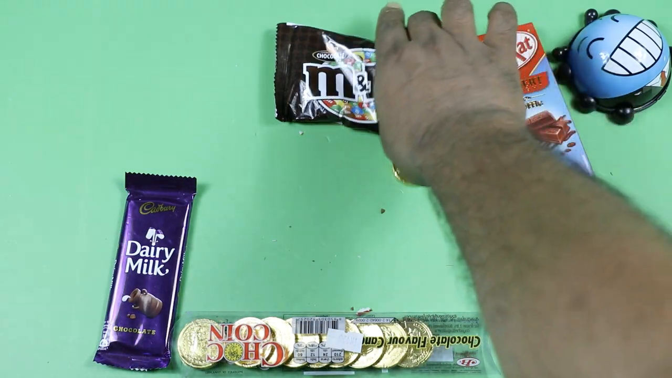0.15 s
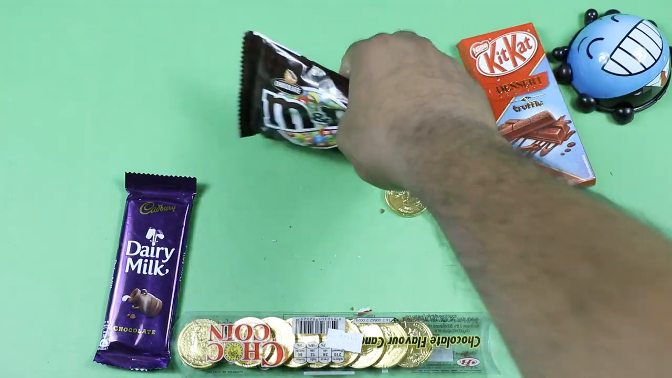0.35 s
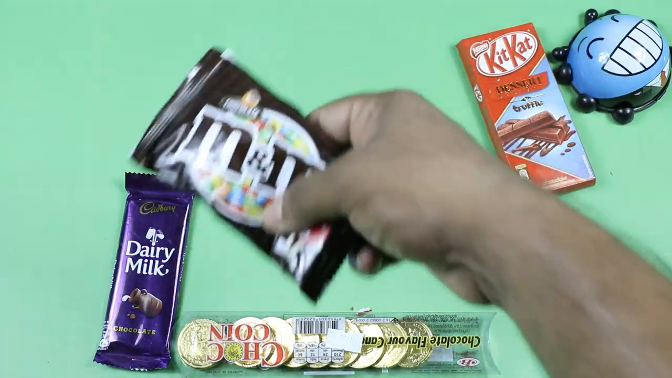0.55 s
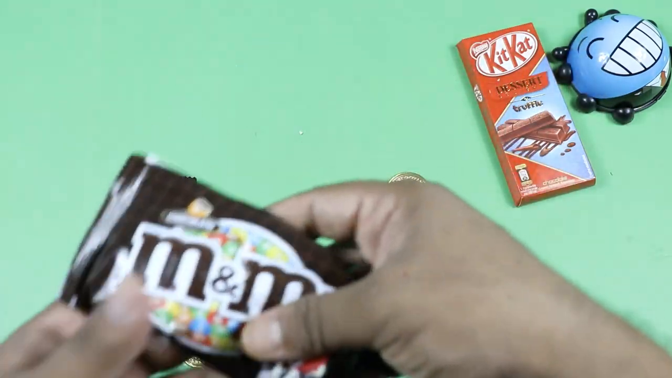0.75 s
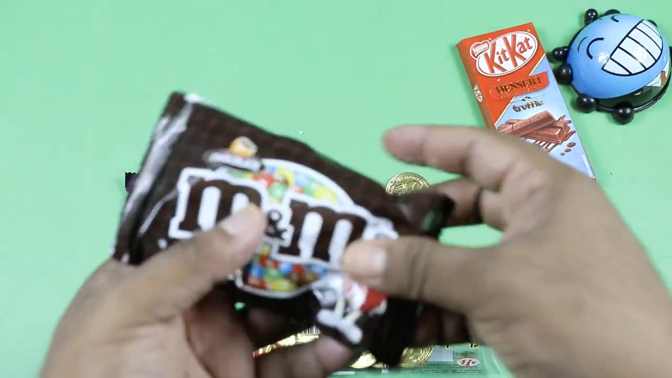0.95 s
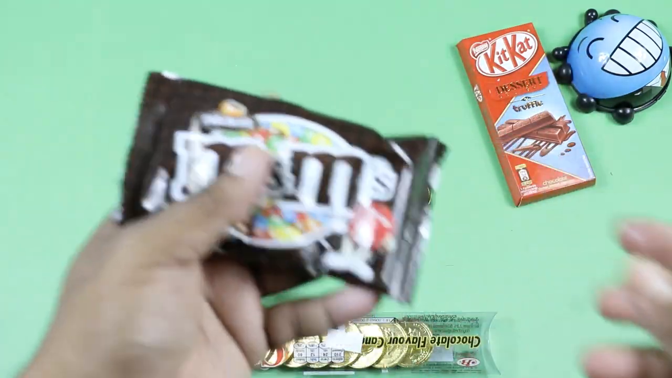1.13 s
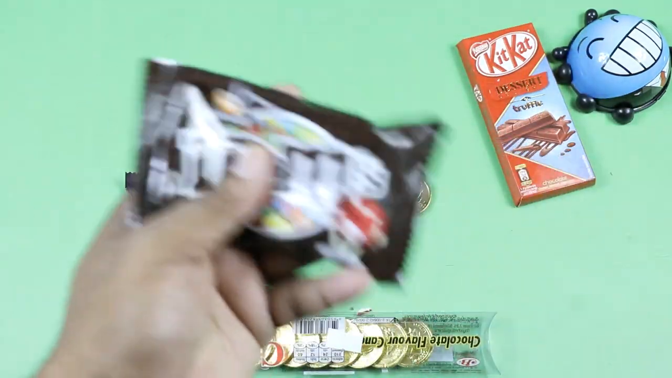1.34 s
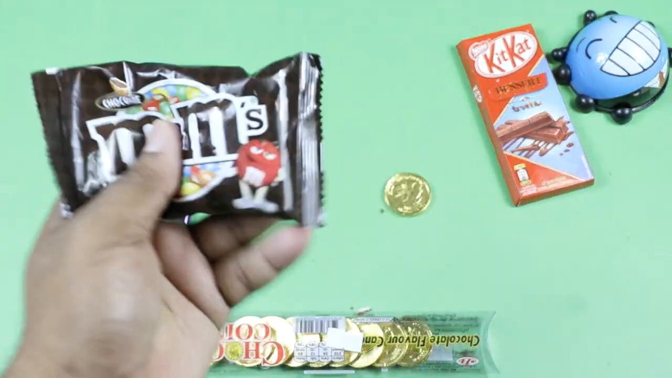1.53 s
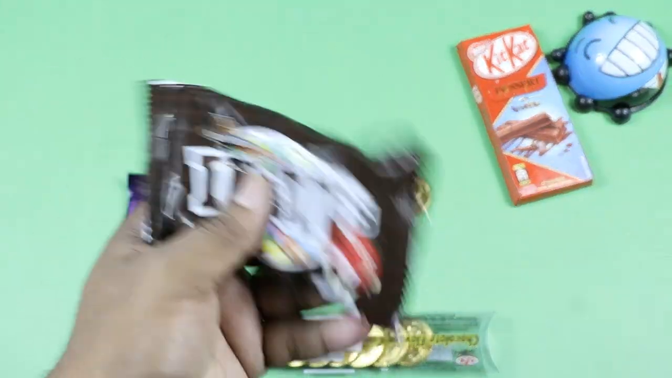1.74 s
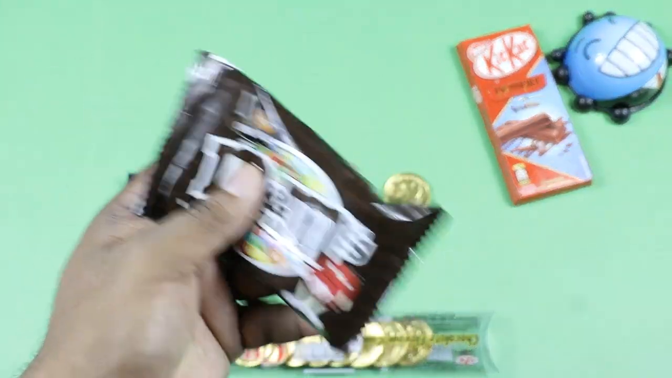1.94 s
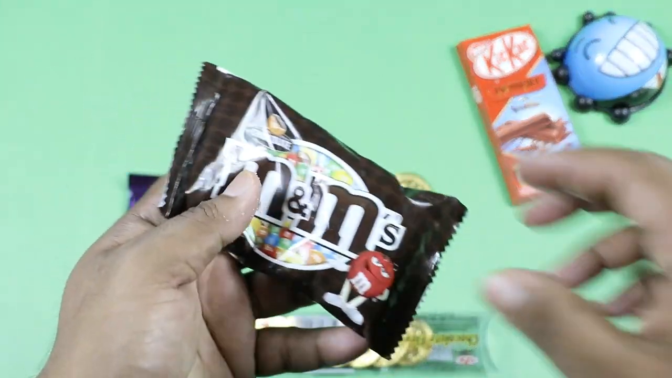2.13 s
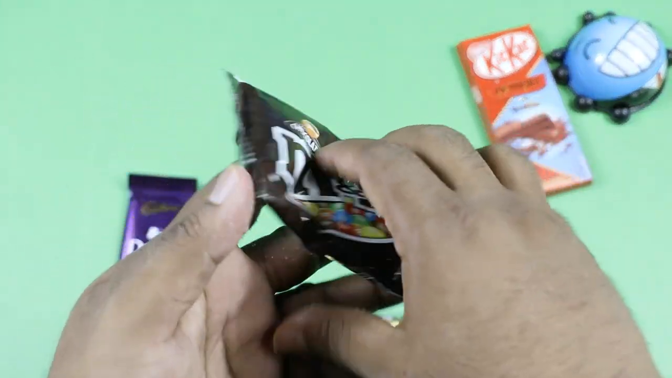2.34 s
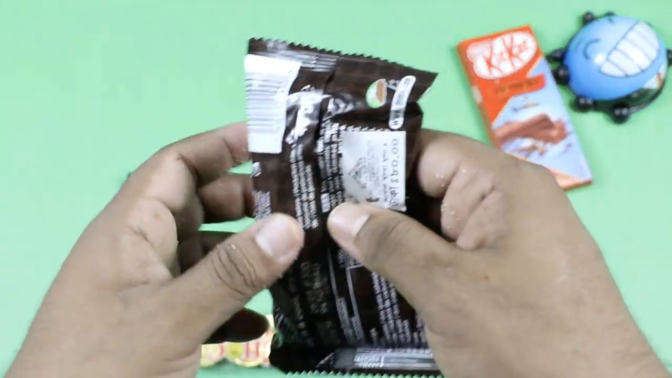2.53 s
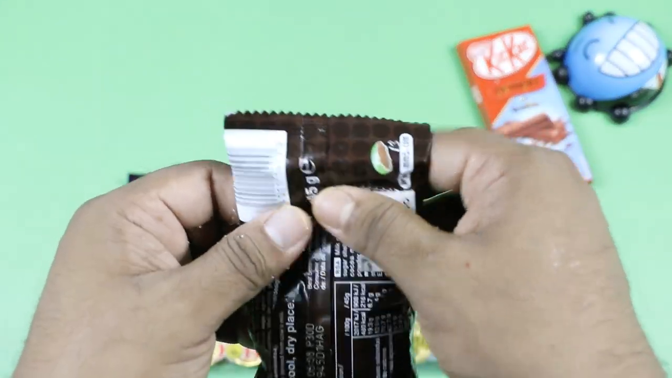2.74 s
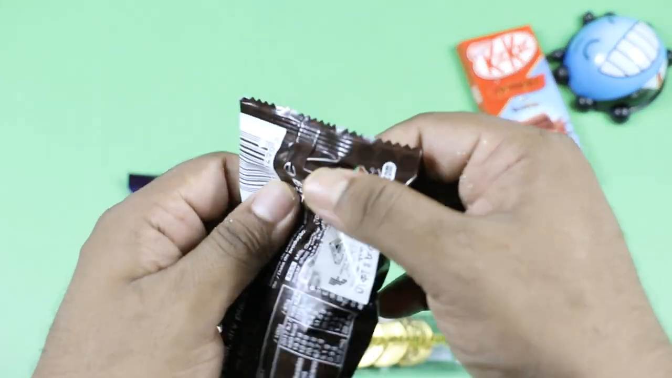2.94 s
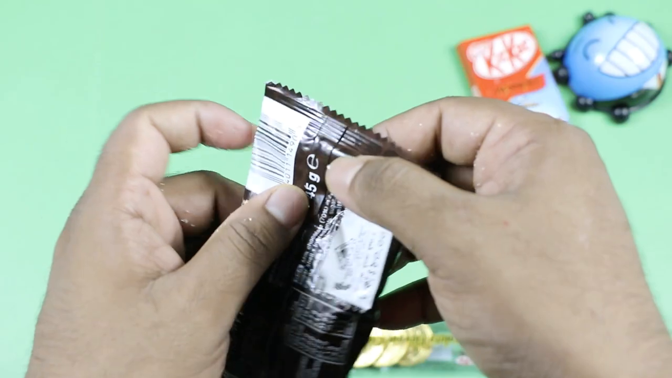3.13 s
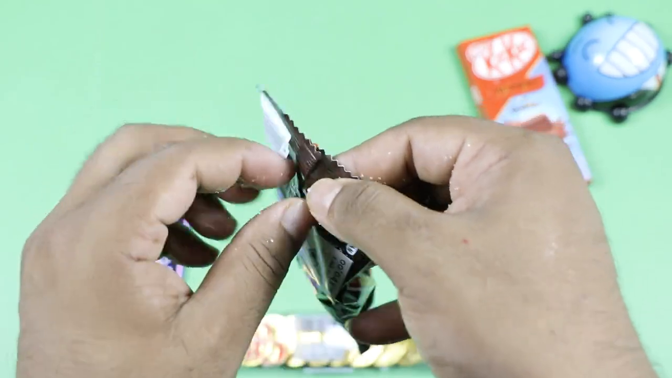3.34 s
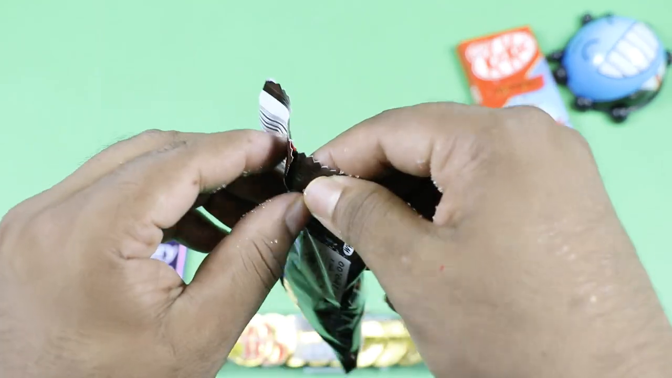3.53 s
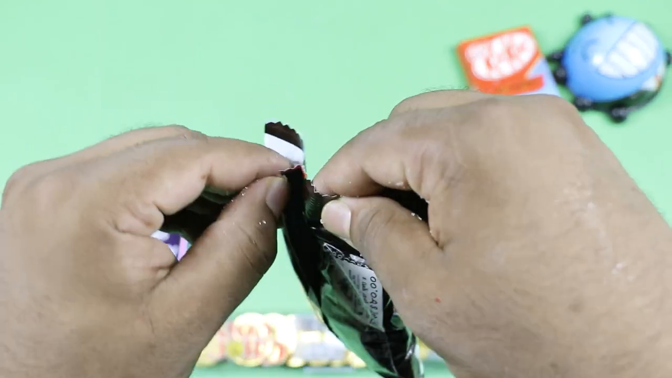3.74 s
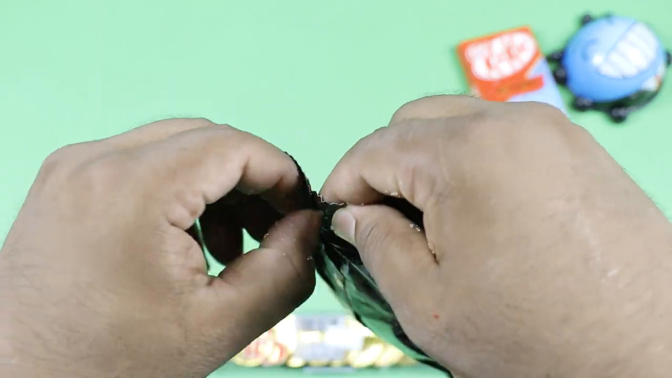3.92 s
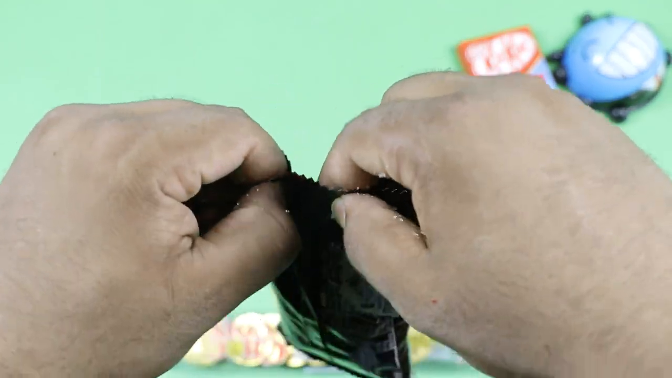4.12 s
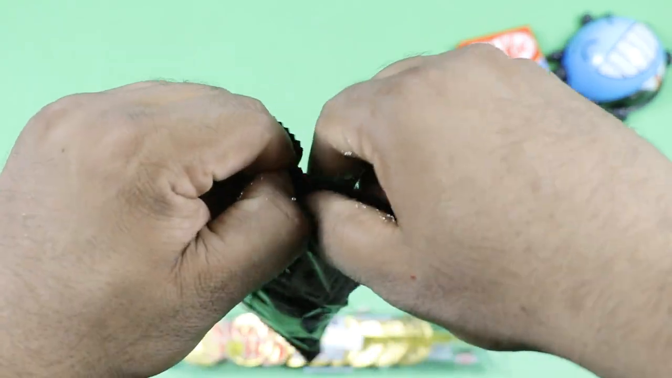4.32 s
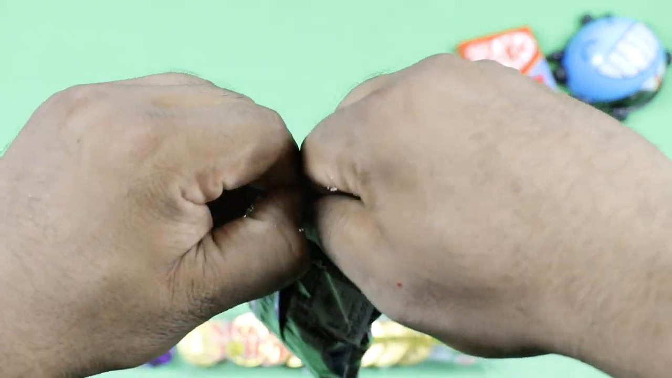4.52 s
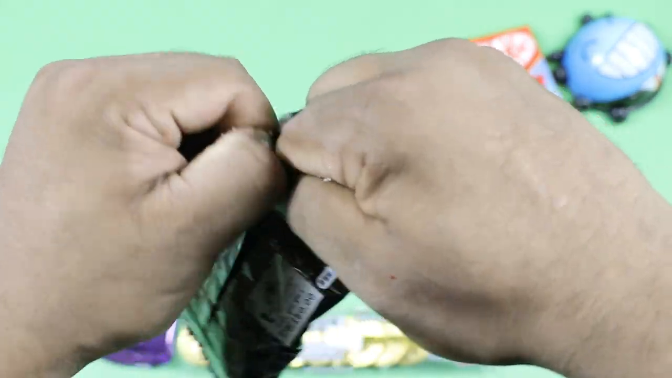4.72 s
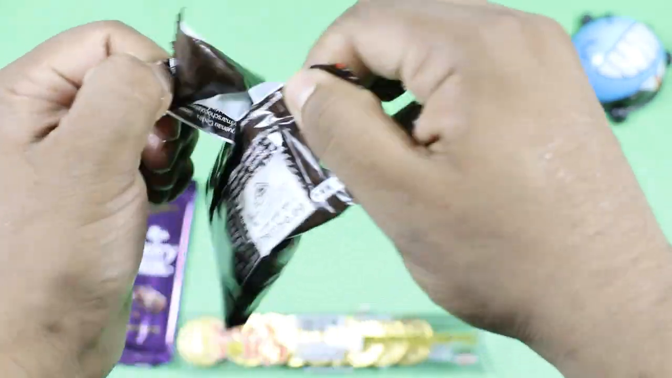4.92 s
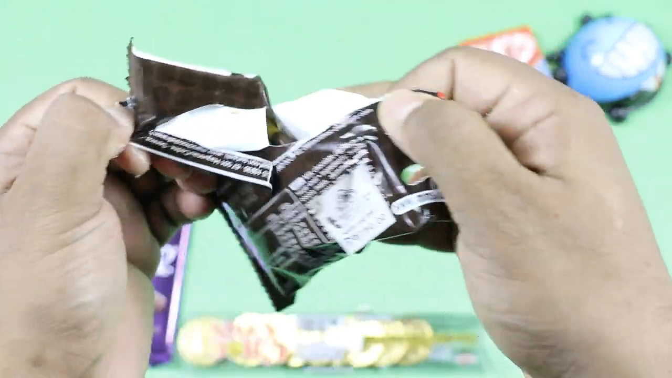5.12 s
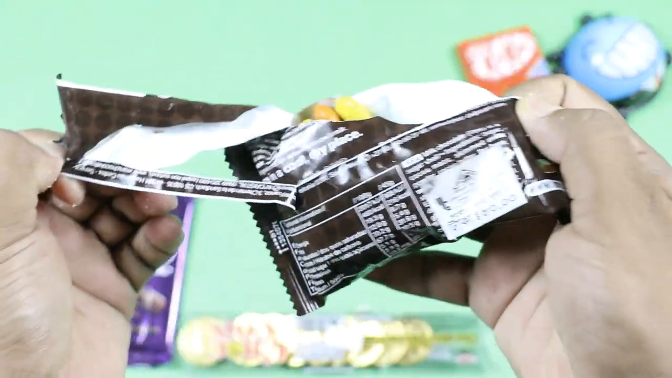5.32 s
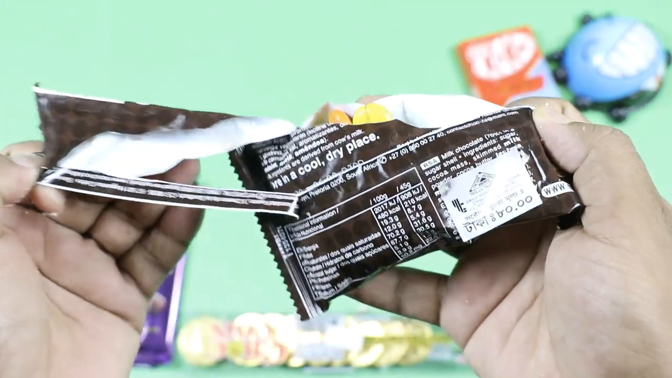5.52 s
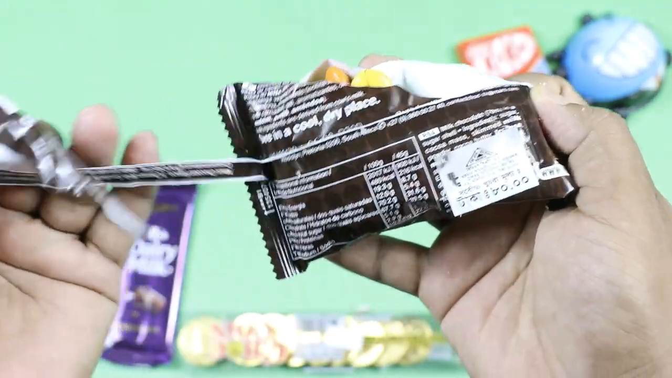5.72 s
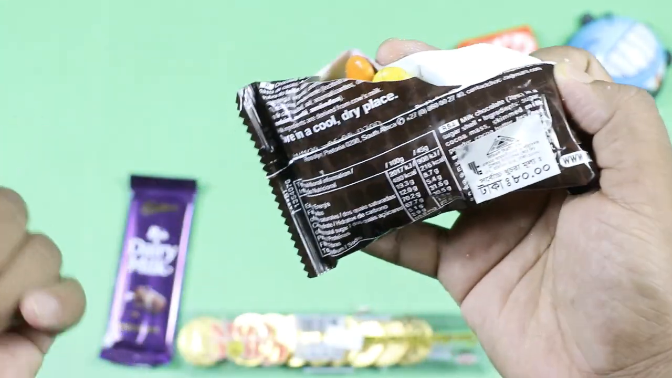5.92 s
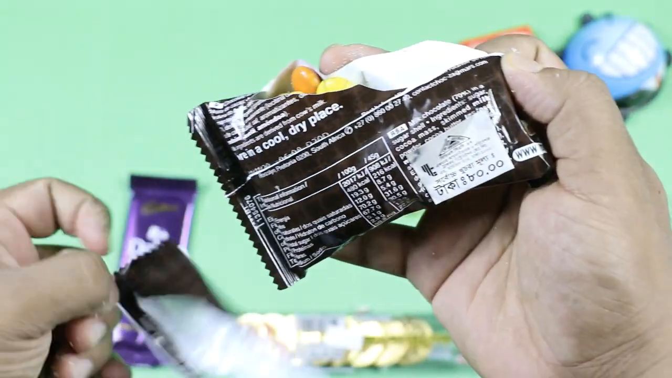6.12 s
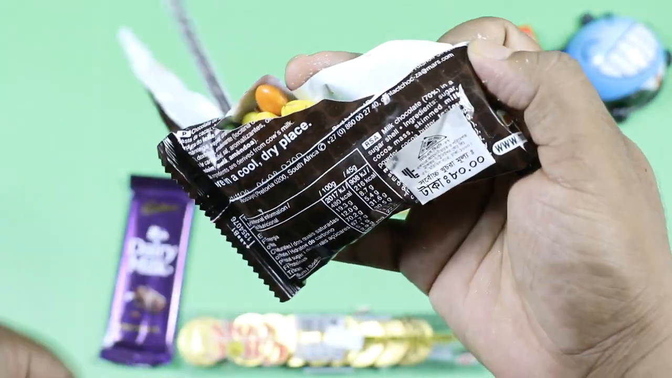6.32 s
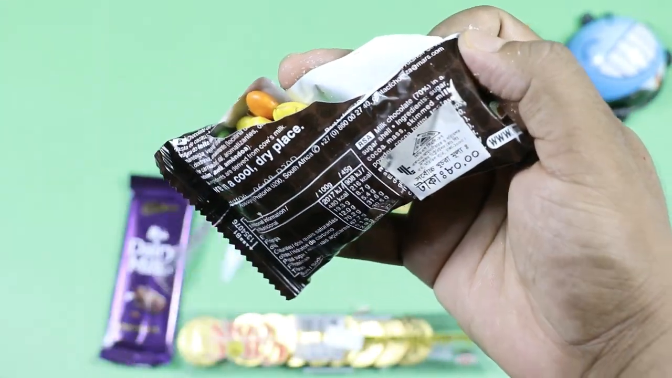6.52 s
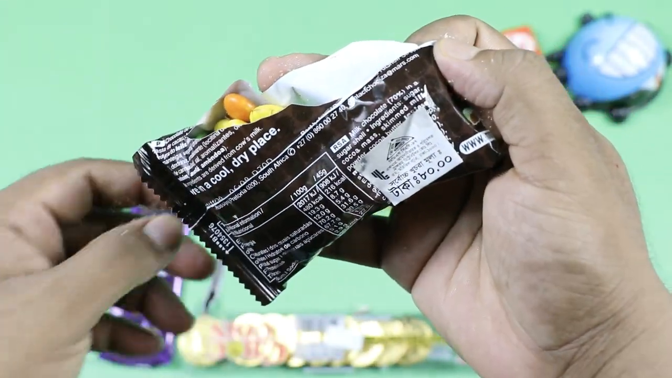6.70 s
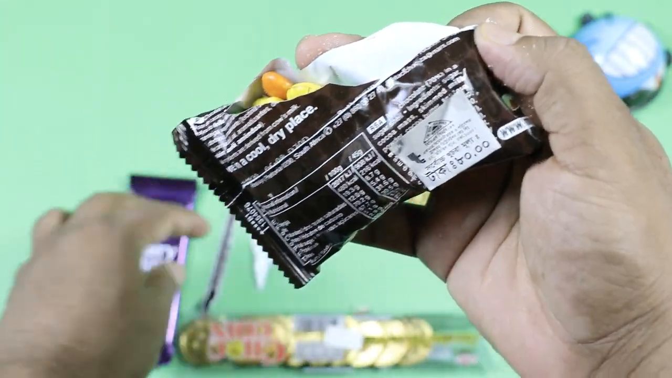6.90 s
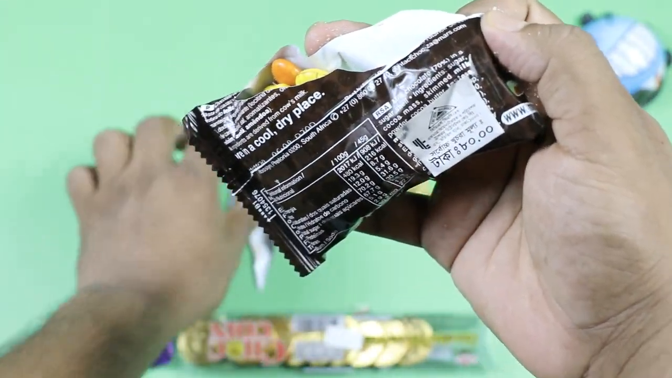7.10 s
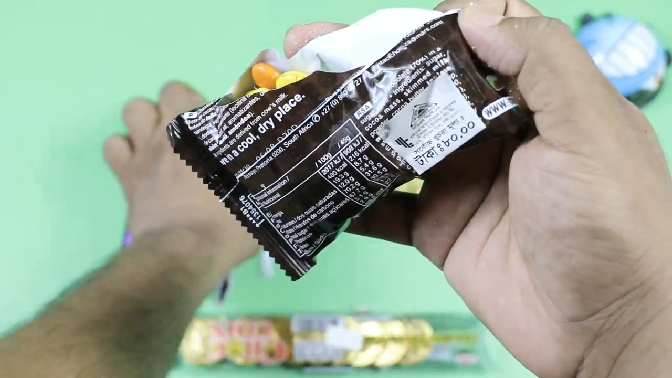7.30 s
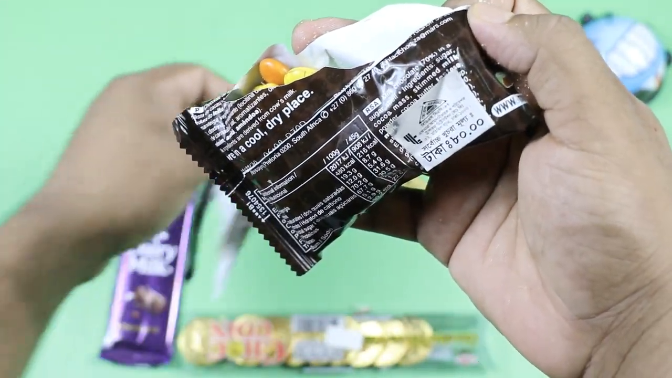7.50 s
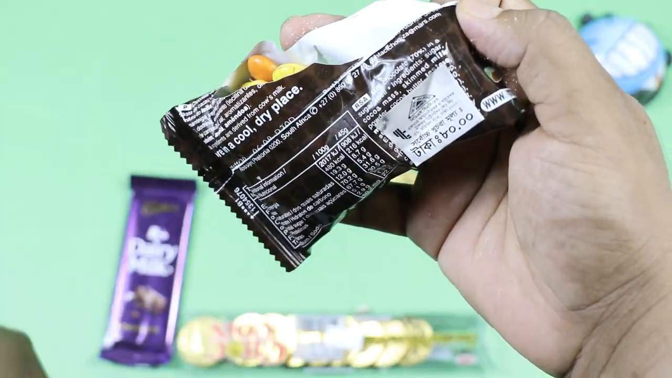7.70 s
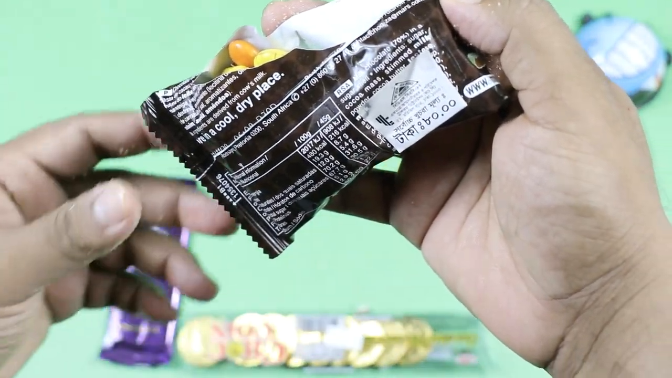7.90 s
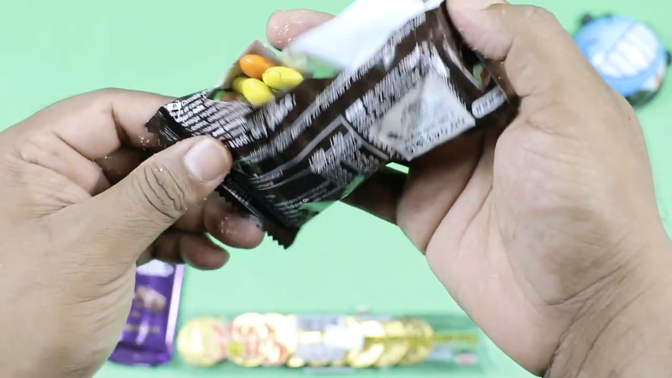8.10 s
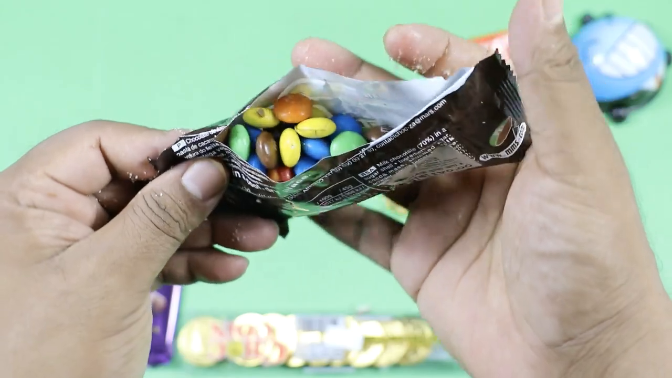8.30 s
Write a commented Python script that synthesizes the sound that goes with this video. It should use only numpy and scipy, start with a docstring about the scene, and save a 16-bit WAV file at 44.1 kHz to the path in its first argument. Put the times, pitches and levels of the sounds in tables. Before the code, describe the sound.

A faint hiss and low hum open the scene. From 0.2 s a plastic bag is grabbed with a loud cluster of sharp snaps, then crinkles more loosely until 1.2 s. Around 1.35 to 2.2 s it is shaken: quick, regular rattling surges of hard sweets, about thirteen a second, fading, with strong cracks on top. After a brief lull, a hard snap near 2.4 s starts uneven crinkling that continues to about 4.6 s, thinning around 4 s as the hum swells. From 4.8 to 5.5 s tearing brings dense, bright, loud cracks; more follow at 5.8 to 6 s. Then it is sparse: light papery rustles, near silence, a crisp tick and soft low table bump at 7.3 to 7.4 s, small crackles to 7.7 s. Loud snaps return at 8.2 s. Close microphone, small room, slight overload on peaks.

```python
"""A plastic bag of sugar-shelled sweets is picked up, shaken and torn; its top strip is dropped on the table.
Each crease snaps as a sharp crack with a pitch of its own, plus a dull thud from the air in the bag.
Thousands of tiny clicks make a crackle that follows the fingers and surges as sweets slide or a fold gives way.
A bump rings the table, a small room answers, and a low hum comes and goes over a faint hiss.
One close microphone overloads on the sharpest snaps."""
import sys
import numpy as np
from scipy import signal
from scipy.fft import rfft, irfft
from scipy.io import wavfile
from scipy.ndimage import uniform_filter1d

SR = 44100
rng = np.random.default_rng(int(sys.argv[2]) if len(sys.argv) > 2 else 0)


def put_to_file(sound):
    """Save the sound as 16-bit audio at rate SR, in the file named by the first command-line argument."""
    columns = np.atleast_2d(sound).T  # one column per channel
    safe = np.clip(columns, -1, 1)
    whole_steps = np.round(safe * 32767)
    wavfile.write(sys.argv[1], SR, whole_steps.astype(np.int16))


N = 368235
TIME = np.arange(N) / SR  # seconds


def from_db(db):
    """Turn decibels into an amplitude factor."""
    return 10 ** (np.asarray(db) / 20)


def rms_one(x):
    """Scale a sound to an average (rms) level of 1."""
    return x / np.sqrt(np.mean(x ** 2) + 1e-20)


def unit_energy(x):
    """Scale a sound so that its squares add up to 1."""
    return x / np.sqrt(np.sum(x ** 2) + 1e-20)


def at_hz(rows, hz):
    """Read each column of a spectrum at the given frequencies, on a logarithmic pitch scale."""
    points, *columns = np.transpose(rows)
    return [np.interp(np.log(hz + 1), np.log(points), column) for column in columns]


def band(x, low_hz, high_hz, order=2):
    """Keep the frequencies between two limits, with a filter that never looks ahead."""
    top = min(high_hz, .43 * SR)
    low = min(low_hz, .75 * top)
    sections = signal.butter(order, [low, top], "band", fs=SR, output="sos")
    return signal.sosfilt(sections, x + 1e-18)


def add_resonances(x, rows, driven):
    """Boost or hollow out bands one after another, wherever 'driven' is 1."""
    for hz, width_hz, gain_db in rows:
        b, a = signal.iirpeak(hz, hz / width_hz, fs=SR)
        x = x + (from_db(gain_db) - 1) * signal.lfilter(b, a, x * driven)
    return x


def add(out, s, sound):
    """Mix a short sound in at a given time in seconds."""
    start = int(np.clip(round(s * SR), 0, N))
    out[start:start + len(sound)] += sound[:N - start]


def buckle(count, crack_s, flutter_s, flutter_db, size=900):
    """Pulses of buckling film, one a row: a sharp crack, then the sheet flutters for a few milliseconds."""
    age = np.arange(size) / SR
    crack = unit_energy(np.exp(-age / crack_s))
    flutter = rng.standard_normal((count, size)) * unit_energy(np.exp(-age / flutter_s))
    return crack + from_db(flutter_db) * flutter


def slips(count, gap_s, slip_db, size=400):
    """A crease gives way in one main slip and a few weaker ones just after it: one chain a row."""
    chains = np.zeros((count, size))
    chains[:, 0] = 1
    draws = rng.exponential(1, (count, 2, 3))
    for chain, (gaps, losses) in zip(chains, draws):
        at = np.minimum(1 + np.cumsum(gaps) * gap_s * SR, size - 1).astype(int)
        weaker = from_db(slip_db * (.5 + np.cumsum(losses) / 2))
        chain[at] += weaker * (-1) ** at
    return chains


# Single crease snaps that stand out, loud or alone. Each row: start in seconds, level in dB as if spread
# over 3 ms, ring pitch in Hz, thud of the bag in dB relative to the crack. snaps() trims both levels.
CLEAR_SNAPS = [(0.214, -14, 3480, -13), (0.2549, -6.5, 2205, -34), (0.2891, -9.5, 3400, -24.5),
               (0.3247, -4.5, 3600, -23), (0.3462, -11, 2100, -35), (0.3996, -8.5, 3400, -12),
               (0.4739, -16, 3000, -14), (0.5322, -14.5, 2200, -17), (0.5651, -11, 3630, -36),
               (0.6526, -12.5, 3620, -29), (0.69, -9, 2320, -26), (0.7041, -17, 2080, -16),
               (0.7481, -10.5, 3240, -18.5), (0.7972, -10, 2854, -19), (0.8478, -14.5, 3200, -16),
               (0.928, -8.5, 3100, -22), (0.9376, -16.5, 4500, -11), (0.97, -12, 2420, -13),
               (0.9868, -18, 5100, -40), (1.0578, -9.5, 2800, -29.5), (1.106, -22, 3500, -21),
               (1.1668, -21, 2500, -11.5), (1.2064, -15.5, 3270, -11.5), (1.2527, -10.5, 3900, -19),
               (1.3428, -5.5, 3400, -16.5), (1.3781, -9, 4000, -24.5), (1.3875, -11, 2500, -21),
               (1.5674, -12, 3500, -21), (1.6334, -15, 4170, -25), (1.6455, -7, 2476, -18.5),
               (1.751, -9, 2300, -22), (1.7946, -7, 2800, -16.5), (1.8508, -9, 2900, -10),
               (1.8619, -9.5, 2700, -19), (1.8787, -13.5, 3600, -30), (2.011, -5, 1980, -10.5),
               (2.1598, -30, 3200, -21), (2.2032, -17, 3300, -13.5), (2.3067, -17, 2290, -14),
               (2.3253, -24.5, 5000, -39), (2.358, -16, 4000, -21.5), (2.367, -3, 2540, -25),
               (2.4081, -12.5, 4340, -18), (2.4249, -10.5, 4800, -28), (2.4928, -11.5, 4760, -28),
               (2.5719, -13, 3376, -36), (2.5901, -14, 9000, -37), (2.599, -11.5, 4470, -41),
               (2.6396, -16, 2710, -26), (2.6992, -11, 3000, -18), (2.7185, -12, 3800, -14),
               (2.746, -16.5, 4330, -31), (2.7927, -15, 3000, -27), (2.8244, -13.5, 3620, -27),
               (2.9187, -18, 2920, -27), (2.985, -22, 3400, -29), (3.0468, -16.5, 2500, -15.5),
               (3.0739, -17, 3720, -21), (3.1066, -13, 4200, -21), (3.1375, -13.5, 3650, -18),
               (3.229, -12, 2660, -26), (3.2606, -11.5, 4160, -12.5), (3.3549, -23.5, 3600, -7),
               (3.442, -15.5, 4100, -18), (3.4793, -11, 4630, -16), (3.584, -18, 3600, -24),
               (3.6358, -16, 6470, -40), (3.6689, -24, 3780, -39), (3.7868, -17.5, 4930, -16),
               (3.8213, -12.5, 3100, -23), (3.8293, -12.5, 3600, -29), (3.8949, -21, 3390, -25),
               (3.9714, -13.5, 4790, -42), (4.0425, -28, 3000, -28), (4.1545, -17, 2600, -19),
               (4.1749, -18.5, 5700, -28), (4.2068, -13.5, 3680, -8), (4.226, -15.5, 3360, -21),
               (4.2843, -16.5, 6500, -30), (4.3797, -12, 4750, -18.5), (4.5088, -23.5, 2510, -11.5),
               (4.5936, -16.5, 3640, -32.5), (4.6215, -26, 3500, -5), (4.7342, -14.5, 6400, -24),
               (4.7721, -10, 3720, -18.5), (4.8202, -10.5, 3830, -16), (4.8449, -6, 2300, -25),
               (4.8813, -11, 4700, -19.5), (4.9293, -10.5, 3600, -16), (4.963, -11.5, 4000, -12.5),
               (4.9667, -9, 3684, -31), (5.0011, -15.5, 2800, -17.5), (5.0851, -11.5, 5400, -10),
               (5.1048, -10, 5150, -18.5), (5.1472, -15, 2906, -12), (5.1669, -14, 3500, -26),
               (5.2074, -11.5, 5300, -11), (5.2512, -9, 3190, -25), (5.3141, -14, 4300, -25),
               (5.3234, -9.5, 5600, -33), (5.3636, -14, 9000, -20), (5.4039, -6.5, 7100, -39),
               (5.4437, -12.5, 8346, -37), (5.474, -19, 8700, -39.5), (5.5345, -20.5, 6510, -35),
               (5.6125, -17.5, 1950, -11.5), (5.6342, -14.5, 4750, -17.5), (5.767, -10.5, 4960, -10.5),
               (5.8322, -15.5, 4800, -38), (5.8322, -17, 4800, -38.5), (5.8416, -13, 3820, -19),
               (5.8735, -9, 3928, -22.5), (5.8893, -10.5, 5100, -31), (5.9021, -14.5, 4280, -36),
               (5.9533, -12.5, 4900, -34), (6.0434, -24.5, 3500, -38), (6.206, -17, 4575, -28),
               (6.2307, -19, 6450, -20), (6.288, -29.5, 7000, -33), (6.4878, -22, 3040, -25),
               (6.5951, -26.5, 3490, -21), (7.0373, -31, 3700, -27), (7.3786, -10, 5700, -35),
               (7.555, -24.5, 3640, -27), (7.5679, -21, 2630, -25), (7.7011, -14.5, 4680, -27),
               (7.8496, -46, 2910, -25), (8.1356, -26.5, 1780, -13), (8.1851, -18, 4530, -10.5),
               (8.2258, -3.5, 3040, -31), (8.2764, -6, 4570, -20.5)]


def snaps(lesser, level_db, thud_db, ring_width, thud_s):
    """Each crease, clear or lesser, rings at a pitch of its own and jolts the air in the bag."""
    rows = CLEAR_SNAPS + lesser
    out = np.zeros(N)
    window = np.sqrt(.003 * SR)  # energy of 3 ms at level 1
    pulses = buckle(len(rows), crack_s=.000012, flutter_s=.0019, flutter_db=-.5)
    jolts = buckle(len(rows), crack_s=.00002, flutter_s=thud_s, flutter_db=4.5)
    chains = slips(len(rows), gap_s=.0008, slip_db=-10.5)
    spread = max(ring_width, 1.1)  # the ring reaches this factor below and above its pitch
    for (s, db, hz, body_db), pulse, jolt, chain in zip(rows, pulses, jolts, chains):
        slipping = np.convolve(pulse, chain)[:len(pulse)]
        ringing = band(slipping, hz / spread, hz * spread, order=1)
        crack = unit_energy(band(ringing, 850, 21000))
        thud = unit_energy(band(jolt, 300, 984))
        snap = crack + from_db(body_db + thud_db) * thud
        add(out, s, window * from_db(db + level_db) * snap)
    return out


# A grip builds quickly, eases while it lasts and dies away; the held bag is almost still.
GRIP_ATTACK_S, GRIP_EASE_DB_PER_S, GRIP_RELEASE_DB_PER_S, AT_REST_DB = 0.017, 6.5, 258, -79
# The fingers take hold, turn, pull or tear. Each row: start in seconds, length in seconds, level in dB,
# hollow body of the bag in dB and crisp edge in dB, both relative to the sheet. crackle() trims the levels.
FINGER_GRIPS = [(0.16, 0.02, -59, -13.5, -18), (0.215, 0.24, -20, -17, -11.5),
                (0.53, 0.34, -30.5, -15, -17.5), (0.917, 0.063, -23.5, -12, -10.5),
                (1.037, 0.052, -35.5, -8, -11), (1.16, 0.23, -30.5, -6.5, -14),
                (1.323, 0.87, -29.5, -13.5, -11), (2.349, 0.26, -31.5, -12, -8),
                (2.707, 0.3, -30, -24, -8.5), (3.082, 0.23, -31, -18.5, -11),
                (3.353, 0.32, -32.5, -13.5, -9.5), (3.762, 0.13, -33, -17, -12.5),
                (3.977, 0.15, -42.5, -4.5, -9.5), (4.199, 0.29, -33.5, -9, -6),
                (4.579, 0.049, -35.5, -5, -17.5), (4.816, 0.23, -27, -13.5, -6),
                (5.1, 0.28, -25.5, -11.5, -6), (5.467, 0.16, -40, -17, -8.5), (5.767, 0.17, -33, -15.5, -9),
                (6.194, 0.049, -45.5, -12, -11.5), (6.466, 0.051, -50.5, -14, -7.5),
                (6.595, 0.042, -48, -10.5, -4), (7.377, 0.029, -32, -14, -7.5),
                (7.457, 0.165, -46, -20, -13), (7.687, 0.013, -37.5, -10.5, -9),
                (8.101, 0.035, -43.5, -12.5, -9), (8.174, 0.26, -34, -12.5, -7)]


def grips():
    """Level, hollowness and crispness of the crackle in dB at every sample; stronger grips colour it more."""
    total = np.full(N, from_db(AT_REST_DB))
    colour = np.mean(FINGER_GRIPS, axis=0)[3:, None] * total
    for s, length_s, db, body_db, edge_db in FINGER_GRIPS:
        near = slice(*np.searchsorted(TIME, [s - GRIP_ATTACK_S, s + length_s + .5]))
        age = TIME[near] - s
        ease_db = GRIP_EASE_DB_PER_S * age
        release_db = GRIP_RELEASE_DB_PER_S * np.maximum(age - length_s, 0)
        attack = np.clip(1 + age / GRIP_ATTACK_S, 0, 1)
        force = attack * from_db(db - ease_db - release_db)
        total[near] += force
        colour[:, near] += np.outer([body_db, edge_db], force)
    body, edge = colour / total
    return 20 * np.log10(total), body, edge


# Lesser creases: level relative to the grip, its random spread and its upper limit before snaps() trims it.
LESSER_PER_S, LESSER_DB, LESSER_SPREAD_DB, LESSER_LIMIT_DB = 26, 11.5, 1.5, -16.5
LESSER_RING_HZ, LESSER_SPREAD_OCTAVES, LESSER_THUD_DB = 3450, .35, -5


def lesser_snaps(level, body):
    """Strain under the fingers lets go at uneven intervals; a firmer grip makes louder snaps, up to a limit."""
    draws = rng.standard_normal((int(LESSER_PER_S * N / SR), 4))
    s = (np.arange(len(draws)) + .5 * draws[:, 0]) / LESSER_PER_S
    at = np.clip(s * SR, 0, N - 1).astype(int)
    db = np.minimum(level[at] + LESSER_DB + LESSER_SPREAD_DB * draws[:, 1], LESSER_LIMIT_DB)
    hz = LESSER_RING_HZ * 2 ** (LESSER_SPREAD_OCTAVES * draws[:, 2])
    thud_db = body[at] + LESSER_THUD_DB + LESSER_SPREAD_DB * draws[:, 3]
    gripped = level[at] > AT_REST_DB + 20
    return list(np.transpose([s, db, hz, thud_db])[gripped])


def tiny_creases(per_s, size_db, even_over=900):
    """A random run of small clicks of many different shapes, its level evened out over a number of samples."""
    at = np.flatnonzero(rng.random(N) < per_s / SR)
    loudness = from_db(size_db * np.minimum(rng.exponential(1, N), 4))
    sizes = (loudness * rng.choice([-1, 1], N))[at]
    shapes = buckle(count=2000, crack_s=.000012, flutter_s=.0009, flutter_db=2.5, size=200)
    # each facet of the film rings for a few cycles at its own pitch
    octaves = 0.804 * rng.standard_normal((len(shapes), 1)).clip(-2, 2)
    cycles = 3000 * 2 ** octaves * TIME[:shapes.shape[1]]
    shapes = shapes + 0.24 * np.sin(2 * np.pi * cycles) * np.exp(-cycles / 3.8)
    dealt = rng.integers(0, len(shapes), N)[at]
    where = at[:, None] + np.arange(shapes.shape[1])
    clicks = sizes[:, None] * shapes[dealt]
    out = np.bincount(where.ravel(), clicks.ravel(), N)[:N]
    return out / np.sqrt(np.abs(uniform_filter1d(out ** 2, size=even_over)) + 1e-6)


def through_film(grains, body_db, edge_db):
    """Clicks sound from the sheet, from the hollow of the bag and from its crisp edges."""
    sheet = rms_one(band(band(grains, 1100, 7300, order=1), 700, 5500, order=3))
    hollow = rms_one(band(grains, 290, 883, order=3))
    crisp = rms_one(band(band(grains, 7000, 22000, order=3), 2300, 11000, order=1))
    return sheet + from_db(body_db) * hollow + from_db(edge_db) * crisp


SHAKE_START_S, SHAKE_PERIOD_S, SHAKE_STROKES = 1.337, .0755, 12
SHAKE_DB, SHAKE_FADE_DB_PER_S, SHAKE_HALF_S = -15, 12, 0.011  # crackle() trims the level


def shakes():
    """In a shaken bag the sweets hit one wall after the other, less hard each time: one surge a stroke."""
    ages = SHAKE_PERIOD_S * np.arange(SHAKE_STROKES)
    return [(SHAKE_START_S + age, SHAKE_DB - SHAKE_FADE_DB_PER_S * age, SHAKE_HALF_S) for age in ages]


# Sweets slide or a fold gives way. Each row: middle in seconds, level in dB before crackle() trims it,
# half length in seconds.
SLIDE_SURGES = [(0.243, -21.5, 0.014), (0.426, -22.5, 0.025), (0.509, -24.5, 0.0054), (0.571, -23, 0.0065),
                (0.856, -24, 0.0052), (0.922, -20.5, 0.0046), (1.051, -24.5, 0.0031), (2.385, -23, 0.0084),
                (2.566, -24, 0.011), (2.706, -24, 0.01), (2.828, -21, 0.0064), (2.924, -20, 0.0037),
                (3.109, -28, 0.012), (3.256, -29.5, 0.015), (3.609, -28.5, 0.0074), (4.384, -22, 0.0027),
                (4.426, -27, 0.0066), (4.771, -28.5, 0.019), (4.839, -17.5, 0.0037), (5.113, -29.5, 0.0048),
                (5.163, -27.5, 0.0052), (5.264, -20, 0.0039), (5.887, -24.5, 0.0031), (7.35, -41.5, 0.024),
                (8.215, -20, 0.0058)]


def crackle(level, body, edge, steady_db, surge_db, body_db, edge_db, tick_db):
    """Loose crackle follows the fingers, dense clatter swells in surges; the grip sets how hollow or crisp."""
    power = np.zeros(N)
    for s, db, half_s in SLIDE_SURGES + shakes():
        near = slice(*np.searchsorted(TIME, [s - 4 * half_s, s + 4 * half_s]))
        swell = np.exp(-.5 * ((TIME[near] - s) / half_s) ** 2)
        power[near] += from_db(db + surge_db) ** 2 * swell
    hollow_db, crisp_db = body + body_db, edge + edge_db
    sparse = tiny_creases(per_s=700, size_db=4.5)
    loose = from_db(level + steady_db) * through_film(sparse, hollow_db, crisp_db)
    dense = tiny_creases(per_s=1900, size_db=4.0, even_over=400)
    clatter = np.sqrt(power) * through_film(dense, hollow_db, crisp_db)
    # lone ticks come from the strained film; a grip above -30 dB makes them no louder
    strain_power = from_db(np.minimum(level, -30)) ** 2
    strain = np.sqrt(np.abs(uniform_filter1d(strain_power, size=1500)))
    lone = tiny_creases(per_s=96, size_db=3, even_over=8000)
    ticks = strain * from_db(tick_db) * rms_one(band(lone, 1900, 7700, order=1))
    return loose + clatter + ticks


def bending(x, corner_hz, order=4):
    """Bending waves cross the film faster in the treble, so every pulse becomes a tiny falling chirp."""
    pole = np.exp(-2 * np.pi * corner_hz / SR)
    for _ in range(order):
        x = signal.lfilter([-pole, 1], [1, -pole], x)  # delays the bass, keeps every level
    return x


# Resonances of the filled bag. Each row: pitch in Hz, width in Hz, gain in dB.
BAG_RESONANCES = [(487, 200, 4), (830, 170, 0), (1240, 440, 2), (1630, 630, -4), (5680, 550, 3),
                  (7500, 3100, -3.5)]


def bag_colour(x):
    """The bag lifts some bands and hollows others."""
    return add_resonances(x, BAG_RESONANCES, driven=1)


STRIP_DOWN_S, STRIP_GONE_S = 6.4, 7.9
# Resonances of the torn strip against the table. Each row: pitch in Hz, width in Hz, gain in dB.
STRIP_RESONANCES = [(1440, 200, 6), (2680, 2100, -1.5)]


def strip_on_table(x):
    """While the strip is on the table, the rustle is papery and hollow."""
    lying = (TIME > STRIP_DOWN_S) & (TIME < STRIP_GONE_S)
    return add_resonances(x, STRIP_RESONANCES, driven=lying)


# The hand bumps the table. Each row: start in seconds, level in dB.
HAND_BUMPS = [(7.309, -25), (7.324, -33)]
# Ringing tones of the table. Each row: pitch in Hz, level in dB relative to the bump,
# time in seconds to fade by 60 dB.
TABLE_MODES = [(72.5, -10, 0.215), (102.4, -4, 0.27), (155.4, 2.5, 0.13), (224, 1.5, 0.26),
               (311.7, -15, 0.12)]


def table_bump():
    """A soft blow sets the low modes of the table ringing."""
    out, age = np.zeros(N), TIME[:SR // 2]
    ring = sum(from_db(db - 60 * age / t60) * np.sin(2 * np.pi * hz * age) for hz, db, t60 in TABLE_MODES)
    for s, db in HAND_BUMPS:
        add(out, s, from_db(db) * ring)
    return out


HAND_PLACES_PER_S = 9  # how often the moving hands reach a place with other reflections
# Reverberation of the room. Each row: pitch in Hz, time in seconds to fade by 60 dB,
# level in dB before room() trims it.
ROOM_REVERB = [(149.9, 0.21, -6), (690, 0.24, -7.5), (1250, 0.49, -7), (2100, 0.211, -7.5),
               (4970, 0.28, -6.5), (9250, 0.12, -9), (15000, .22, -15.5)]


def room(x, wet_db, build_s, count=4):
    """Diffuse reflections build up in milliseconds and fade; their pattern shifts as the hands move."""
    age, tails = TIME[:SR // 3], 0
    edges = np.geomspace(100, 18000, 12)
    for low, high in zip(edges, edges[1:]):
        t60, level_db = at_hz(ROOM_REVERB, np.sqrt(low * high))
        fade = unit_energy(from_db(-60 * age / t60) * (1 - np.exp(-age / build_s)))
        noise = band(rng.standard_normal((count, len(age))), low, high, order=3)
        tails = tails + from_db(level_db + wet_db) * fade * noise
    # the sound fades over from one place to the next, round and round
    place = TIME * HAND_PLACES_PER_S
    nearness = [np.maximum(1 - np.abs((place - k) % count - 1), 0) for k in range(count)]
    return sum(signal.oaconvolve(x * np.sqrt(share), tail)[:N] for share, tail in zip(nearness, tails))


def coloured_noise(spectrum):
    """Steady noise of rms 1, shaped to a spectrum."""
    level_db, = at_hz(spectrum, np.arange(N // 2 + 1) * SR / N)
    return rms_one(irfft(rfft(rng.standard_normal(N)) * from_db(level_db), N))


# The hum swells and fades. Each row: time in seconds, level in dB before background() trims its parts.
HUM_SWELL = [(0.0, -38), (0.3, -39.5), (0.85, -54.5), (1.4, -56.5), (2.2, -67.5), (3.3, -68.5), (3.6, -56),
             (4.1, -40.5), (4.78, -38.5), (4.92, -52), (5.15, -44.5), (5.5, -58.5), (6.1, -60),
             (6.5, -39.5), (7.05, -41.5), (7.35, -36), (8.35, -42)]
# Tones of the hum. Each row: pitch in Hz, level in dB relative to the swell.
HUM_TONES = [(50.53, 0), (101.06, -14), (112, -16), (192, -13), (219, -20), (252.6, -25.5)]
# Shape of the rumble that goes with the hum. Each row: pitch in Hz, relative level in dB per Hz.
RUMBLE_SHAPE = [(15, -21), (30, -6), (56, -2), (90, -6), (200, -7), (350, -13), (700, -23), (3000, -59.5)]
# Shape of the steady hiss. Each row: pitch in Hz, relative level in dB per Hz.
HISS_SHAPE = [(20, -9), (200, -4.5), (700, -7), (1100, -9.5), (1700, -5.5), (2800, -12.5), (6000, -16.5),
              (16000, -17.5)]


def background(hum_db, rumble_db, hiss_db, waver):
    """Low hum of tones whose phase wanders at random, with a rumble, over a faint steady hiss."""
    level = np.interp(TIME, *np.transpose(HUM_SWELL))
    tones = 0
    for hz, db in HUM_TONES:
        wander = waver * hz * np.cumsum(rng.standard_normal(N)) / np.sqrt(SR)
        tone = np.sqrt(2) * np.sin(2 * np.pi * hz * TIME + wander)  # rms 1
        tones = tones + from_db(db + hum_db) * tone
    rumble = from_db(rumble_db) * coloured_noise(RUMBLE_SHAPE)
    hiss = from_db(hiss_db) * coloured_noise(HISS_SHAPE)
    return from_db(level) * (tones + rumble) + hiss


def scene():
    """The bag and the table sound in a small room, over the hum; both channels are alike."""
    level, body, edge = grips()
    lesser = lesser_snaps(level, body)
    bag = snaps(lesser, level_db=.5, thud_db=-2.0, ring_width=1.765, thud_s=.0044)
    bag = bag + crackle(level, body, edge, steady_db=-.5, surge_db=2.0, body_db=-2.5, edge_db=4.0, tick_db=-3.5)
    bag = bag_colour(bending(bag, corner_hz=3200))
    direct = strip_on_table(bag) + table_bump()
    reflections = room(direct, wet_db=-2.0, build_s=.001)
    hum = background(hum_db=-1.5, rumble_db=-8.0, hiss_db=-60.5, waver=.027)
    mono = direct + reflections + hum
    return np.array([mono, mono])


def record(dry, lopsided=0.058):
    """The sharpest peaks overload unevenly, which gives them a low knock; the top is cut at 15950 Hz."""
    bent = dry + lopsided * dry ** 2
    limited = .93 * bent / (1 + bent ** 6) ** (1 / 6)
    return signal.sosfilt(signal.ellip(10, .1, 70, 15950, fs=SR, output="sos"), limited)


dry = scene()
out = record(dry)
put_to_file(out)
```